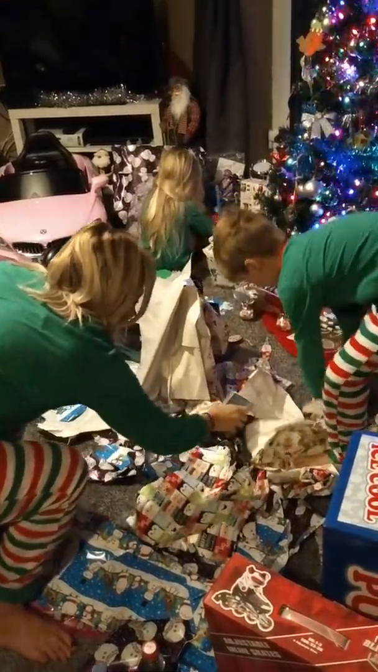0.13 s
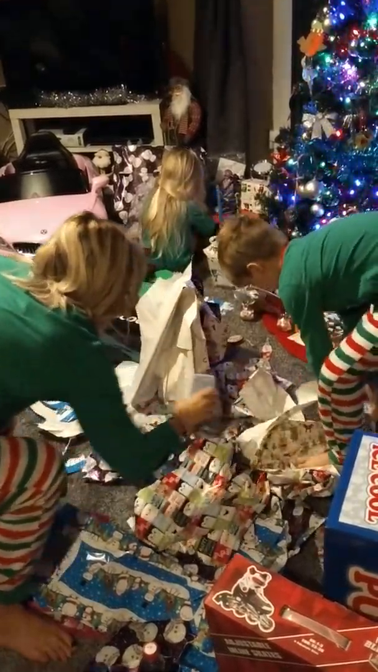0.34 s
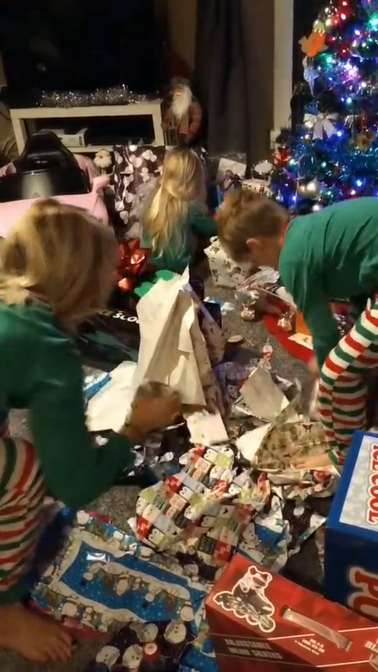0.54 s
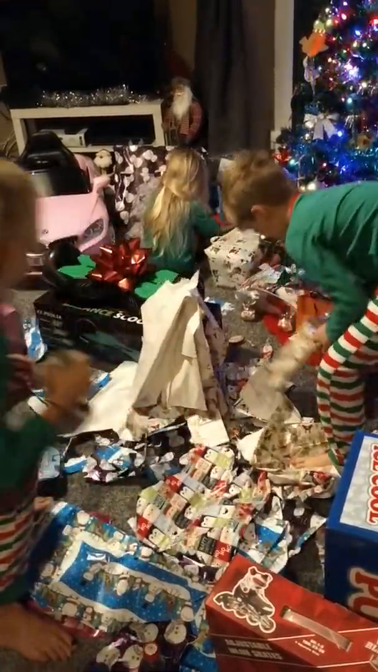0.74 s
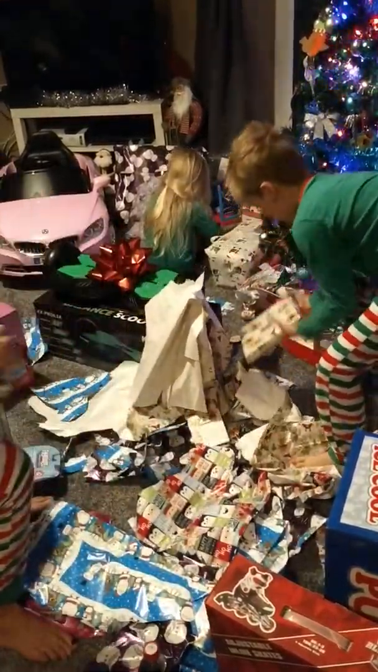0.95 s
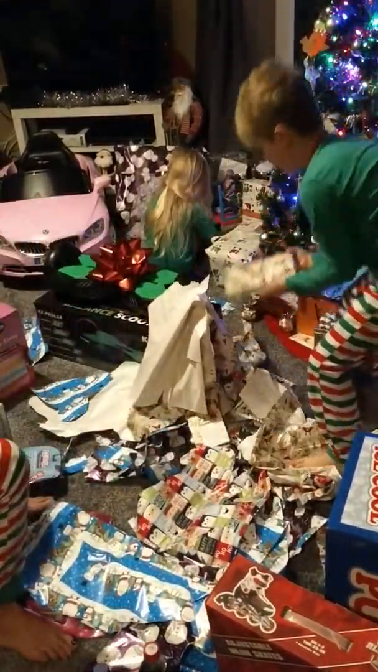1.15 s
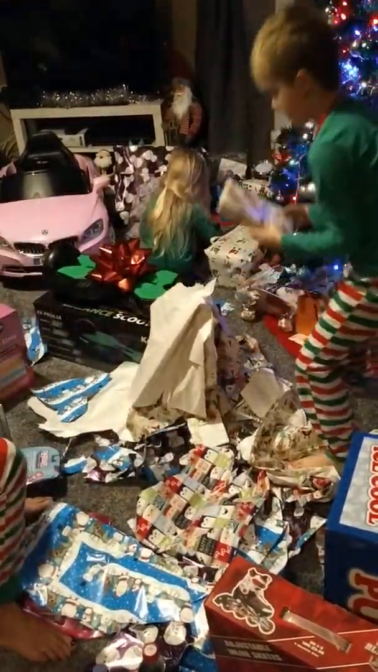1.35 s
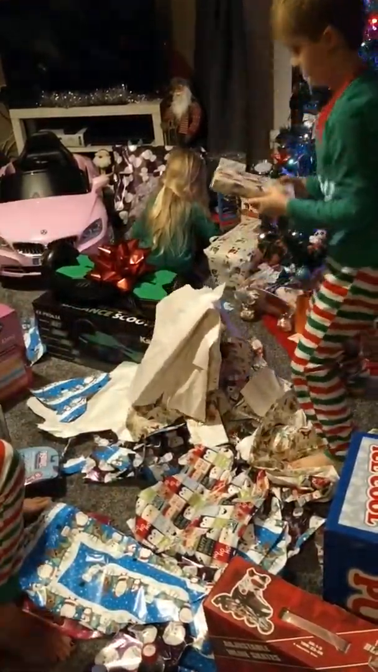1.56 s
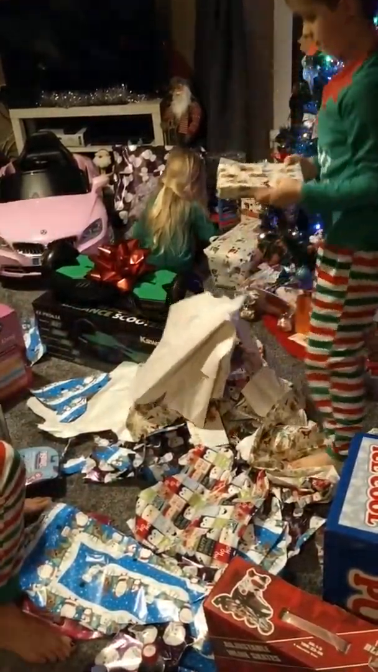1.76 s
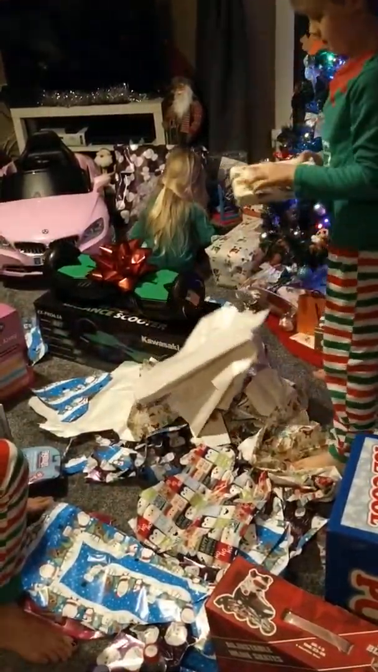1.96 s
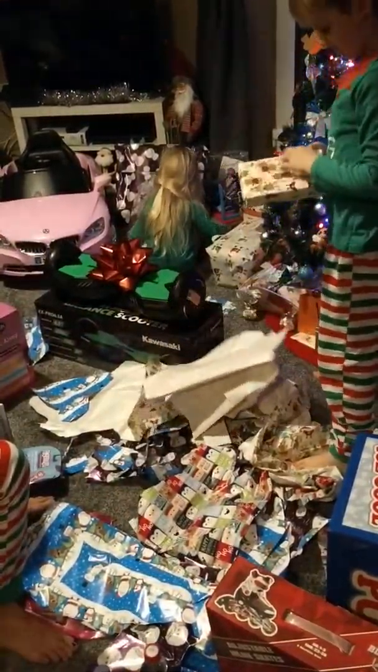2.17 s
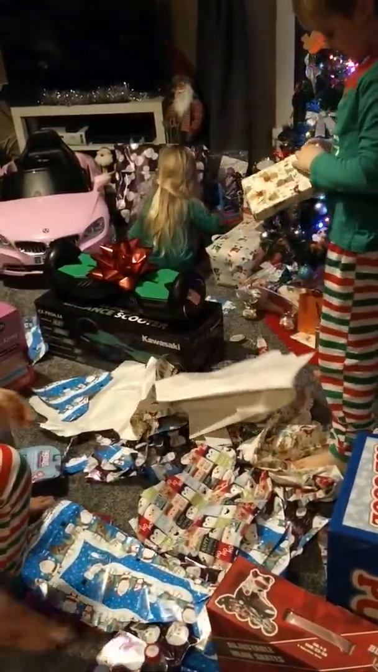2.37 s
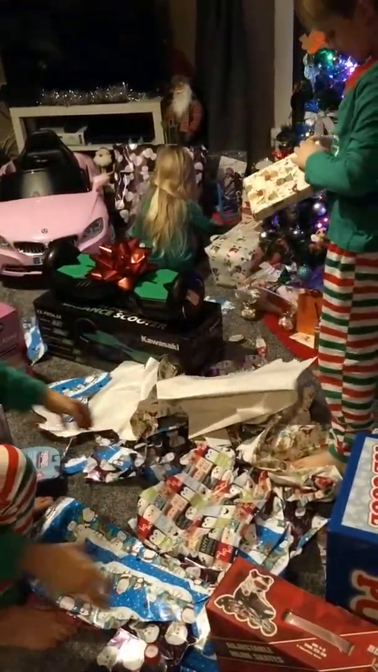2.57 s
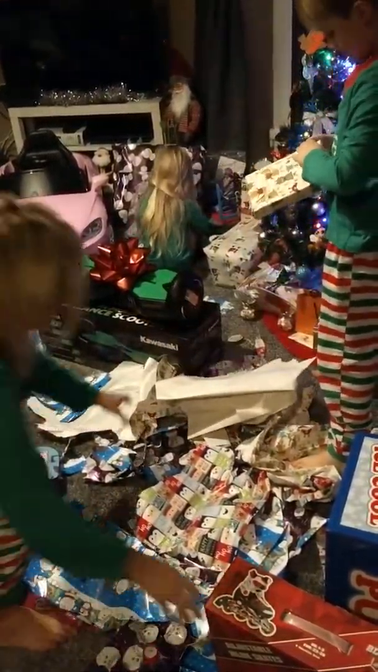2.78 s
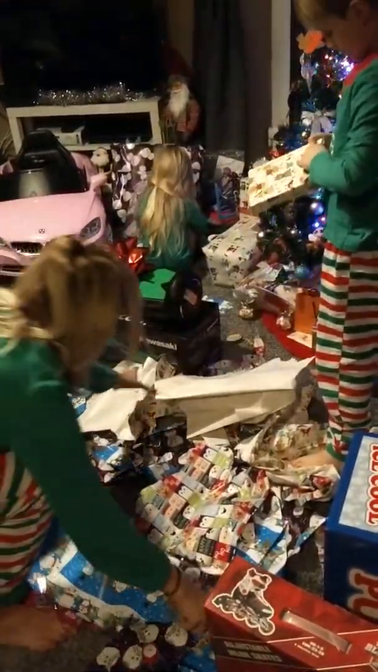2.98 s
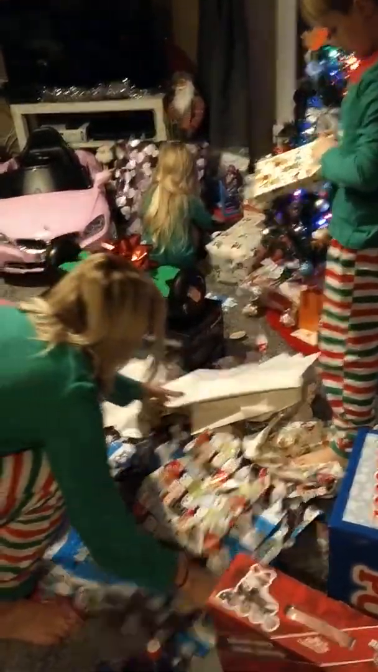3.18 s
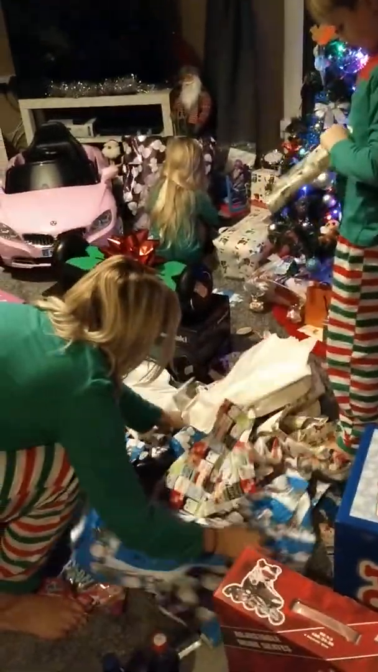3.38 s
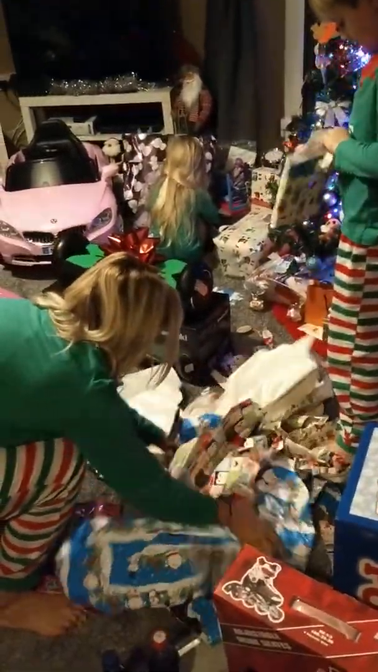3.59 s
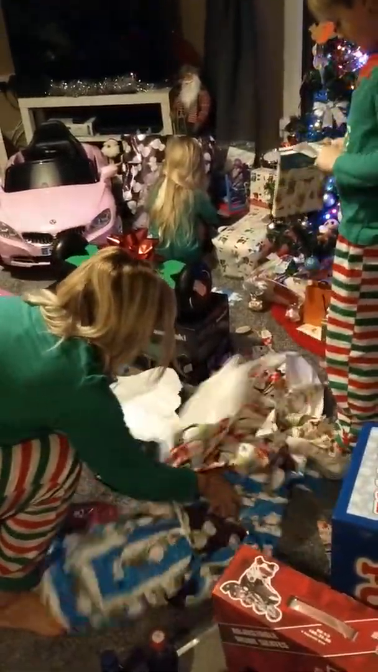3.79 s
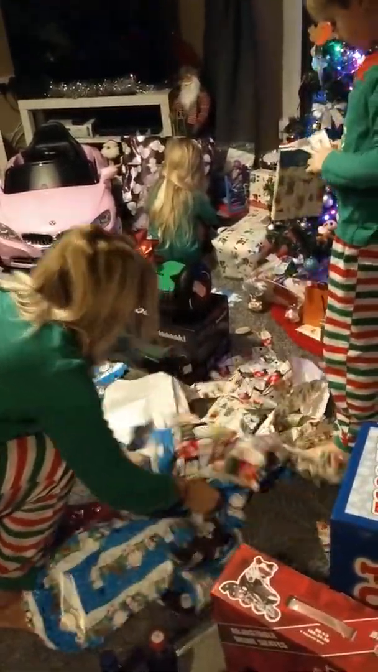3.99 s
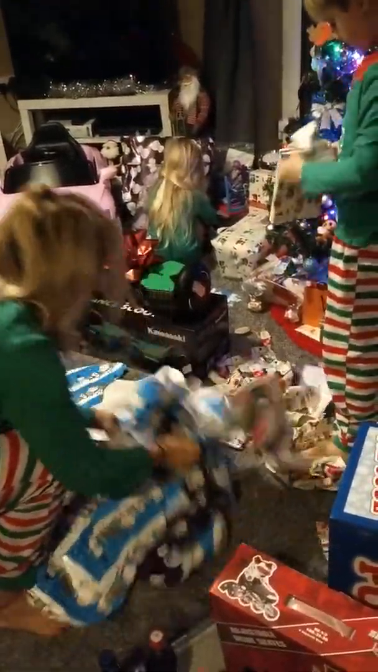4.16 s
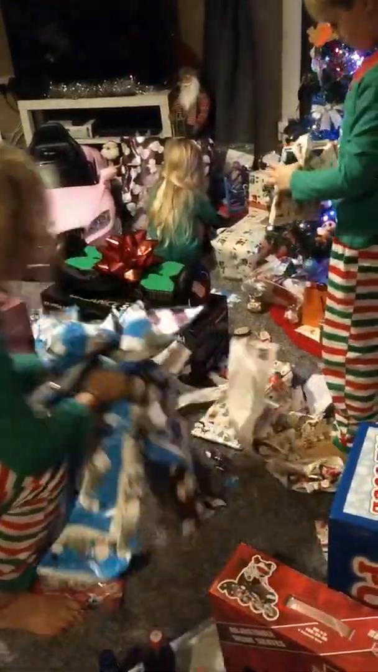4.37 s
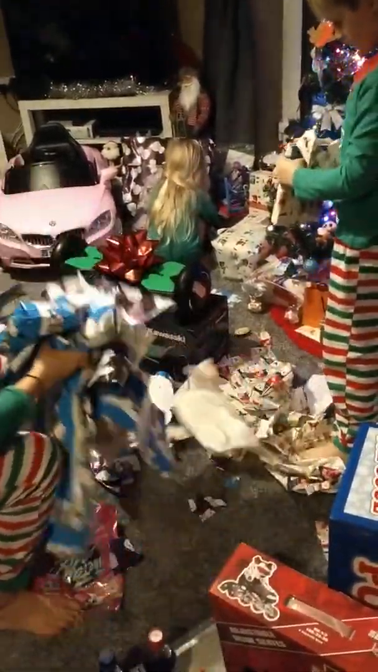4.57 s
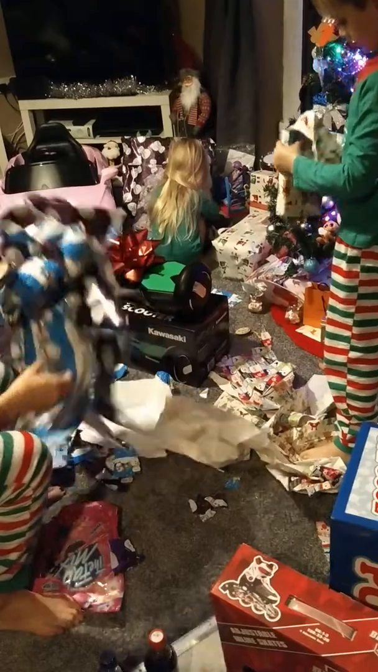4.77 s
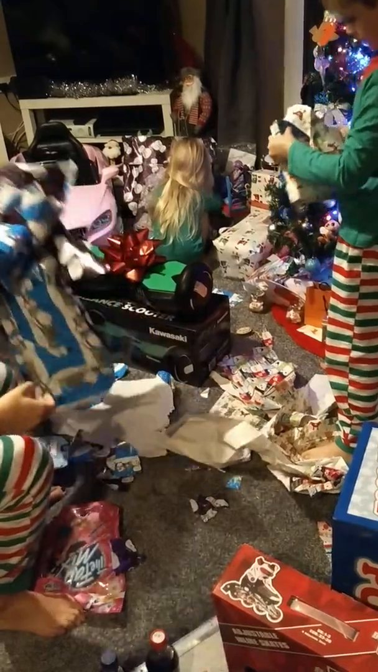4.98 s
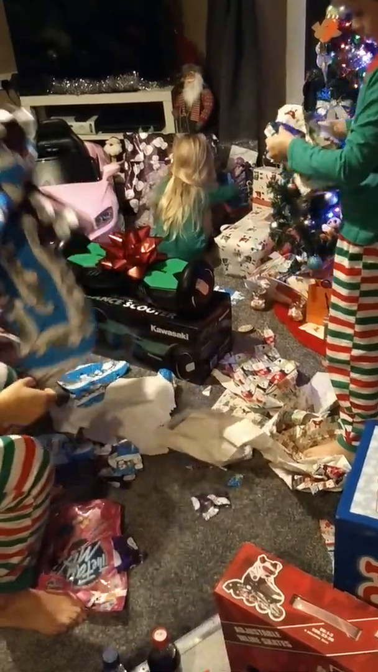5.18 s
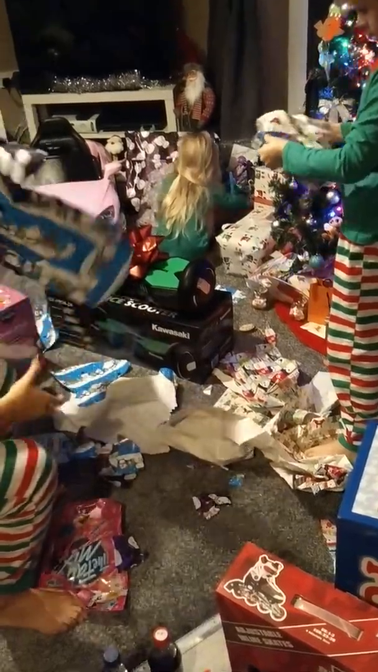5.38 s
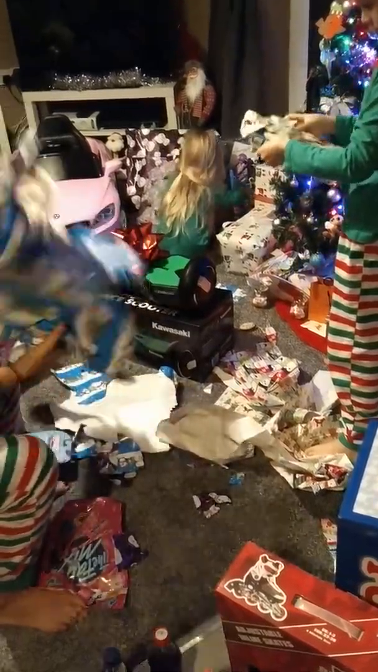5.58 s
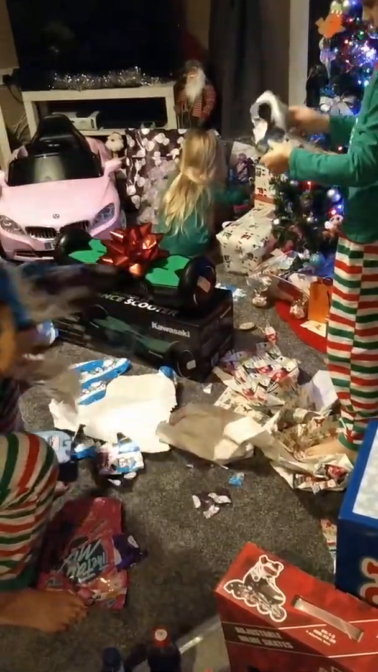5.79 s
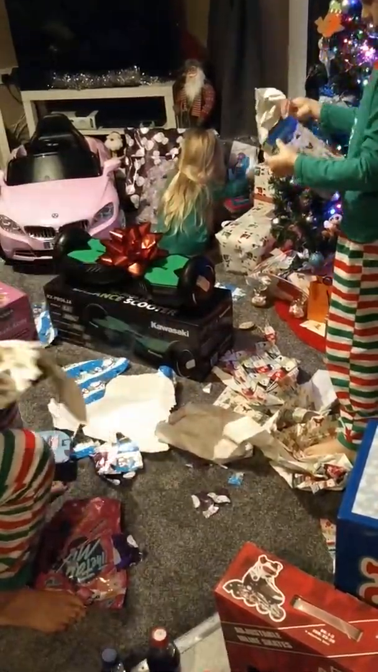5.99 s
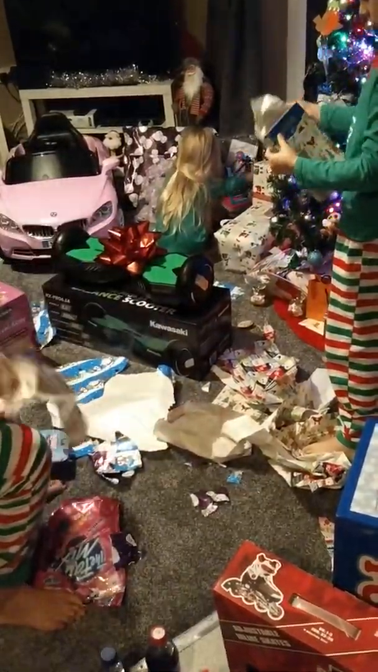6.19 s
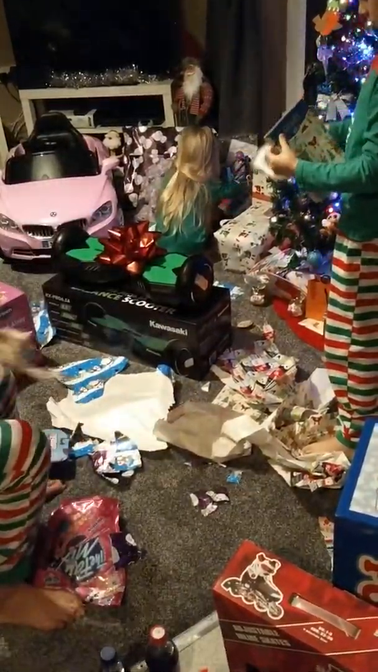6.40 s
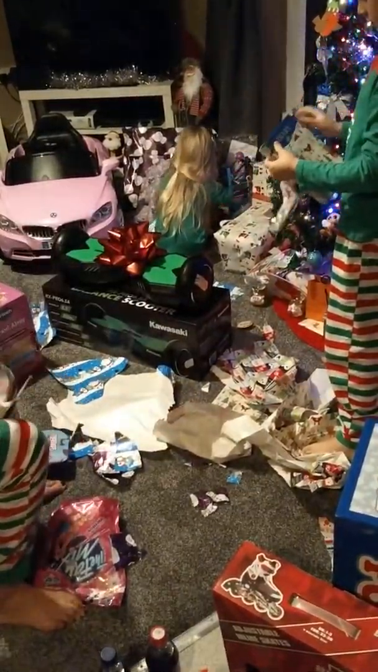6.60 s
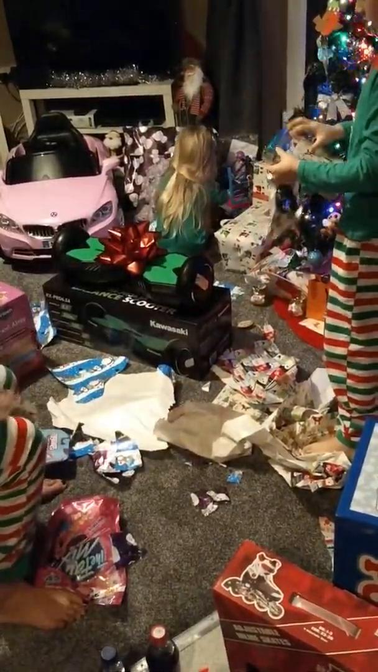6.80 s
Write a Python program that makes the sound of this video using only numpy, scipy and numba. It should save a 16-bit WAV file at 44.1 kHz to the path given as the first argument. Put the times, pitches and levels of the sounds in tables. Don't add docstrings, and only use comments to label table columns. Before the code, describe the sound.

Hands tear and gather wrapping paper indoors, sharp snaps over crisp rustling, two box knocks, and a faint low house hum beneath.

```python
import sys
import numpy as np
from scipy import signal
from scipy.fft import rfft, irfft
from scipy.io import wavfile
from scipy.ndimage import uniform_filter1d, map_coordinates
from numba import njit

SR = 44100
rng = np.random.default_rng(int(sys.argv[2]) if len(sys.argv) > 2 else 0)


def natural_amplitude(level_db):
    exponent = np.asarray(level_db, float) / 20
    return 10 ** exponent


def store_wav(level_fs):
    pcm = np.round(np.clip(np.atleast_2d(level_fs), -1, 1) * 32767)
    wavfile.write(sys.argv[1], SR, pcm.T.astype(np.int16))


N = 302040
PORT_LAG = 18.935


def on_log(hz, table):
    table_hz, table_db = np.transpose(table)
    return np.interp(np.log(np.maximum(hz, 1)), np.log(table_hz), table_db)


def delay(hz, samples):
    return np.exp(-2j * np.pi * hz * samples / SR)


def unit(x):
    return x / np.sqrt(np.mean(x ** 2))


@njit
def rings(start, hz, tau, size, place, count):
    out = np.zeros((count, N))
    for k in range(len(start)):
        pole = np.exp(2j * np.pi * hz[k] / SR - 1 / tau[k])
        push, answer = size[k] * np.e / tau[k] + 0j, 0j
        for i in range(start[k], min(N, start[k] + int(8 * tau[k]))):
            push *= pole
            answer = answer * pole + push
            out[place[k], i] += answer.imag
    return out


def from_all_sides(noises):
    hz = np.fft.rfftfreq(noises.shape[1], 1 / SR)
    lags = np.linspace(-1, 1, len(noises))[:, None] * PORT_LAG / 2
    spectra = rfft(noises)
    ports = [np.sum(spectra * delay(hz, side * lags), axis=0) for side in (1, -1)]
    return irfft(ports, noises.shape[1])


def heard(x, lag, room_db):
    room_t60_s, damp_hz = 0.3, 6300
    t = np.arange(SR // 2) / SR
    walls = from_all_sides(rng.standard_normal((7, len(t)))) * (t > .004)
    dull = signal.lfilter(*signal.butter(1, damp_hz, fs=SR), walls)
    bright = walls - dull
    tail = dull * natural_amplitude(-60 * t / room_t60_s) + bright * natural_amplitude(-120 * t / room_t60_s)
    direct = np.sinc(np.arange(len(t)) - 20 - lag * np.array([[-.5], [.5]]))
    answer = direct + natural_amplitude(room_db) * unit(tail) / np.sqrt(len(t))
    both = signal.fftconvolve(x[None], answer, axes=1)[:, 20:N + 20]
    return both / np.sqrt(1 + natural_amplitude(2 * room_db))


# frequency in Hz, level in dB per Hz.
AIR = [(40, -36), (90, 3), (140, -7.5), (400, -13), (1000, -5.5), (2300, -8.5), (5000, -15), (9000, -22),
       (15500, -20)]
# centre in Hz, width in Hz, level in dB.
HUM_BANDS = [(100, 12, -67), (174, 11, -65), (296.7, 7.6, -67), (334, 60, -64)]


def house():
    hz = np.fft.rfftfreq(N, 1 / SR)
    hiss = rfft(from_all_sides(rng.standard_normal((5, N))))
    air = natural_amplitude(-51.5) * unit(irfft(hiss * natural_amplitude(on_log(hz, AIR)), N))
    for centre, width, db in HUM_BANDS:
        band = rfft(rng.standard_normal(N)) / (1 + ((hz - centre) / width * 2) ** 2)
        air = air + natural_amplitude(db) * unit(irfft([band, band * delay(hz, 4.0)], N))
    return air


# time in seconds, level in dB.
MOTOR_LOAD = [(0.0, -56), (3.62, -55), (3.91, -65), (4.31, -59), (4.54, -66), (5.68, -58), (5.78, -66),
              (6.85, -55)]


def motor():
    t = np.arange(N) / SR
    waver = np.interp(t, np.linspace(0, N / SR, 30), rng.standard_normal(30))
    load_db = np.interp(t, *np.transpose(MOTOR_LOAD)) + 1.5 + 1.8 * waver
    port_phase = np.array([[0], [.15]])
    return natural_amplitude(load_db) * np.sin(2 * np.pi * 140 * t + .5 * waver - port_phase)


def swell(when, peak, db, rise, fall, hold=0):
    since = when[:, None] - peak
    drop = np.maximum(-since / rise, np.maximum(since - hold, 0) / fall)
    return natural_amplitude(2 * (db - 10 * drop))


def gesture(power, weight, fibre_db):
    bands_db = np.array([-8.2 + .41 * weight, weight, 0 * weight, fibre_db])
    return power @ natural_amplitude(2 * bands_db).T


# start in seconds, crackle in dB, fall in seconds per 10 dB, weight in dB, fibre in dB.
TEARS = [(0.002, -47.1, 0.008, 11.5, -11.9), (0.261, -45.7, 0.082, 10.0, -6.8),
         (0.482, -39.7, 0.054, 11.3, -8.0), (1.702, -44, 0.241, -5.6, -6.2),
         (1.8274, -35.1, 0.076, -3.0, -10.1), (1.97, -49.5, 0.319, -11.7, -9.0),
         (2.556, -46.4, 0.044, 17.4, -13.5), (2.6414, -51.1, 0.078, -9.6, -0.2),
         (2.7824, -40.6, 0.147, -8.1, -0.6), (3.004, -33.3, 0.077, -9.1, -23.6),
         (3.0614, -27.1, 0.077, -2.9, -9.1), (4.8174, -38.9, 0.038, -4.5, -1.1),
         (5.1284, -25.0, 0.056, -14.1, -10.1), (5.4524, -45, 0.043, 1.9, -2.0),
         (5.6225, -25, 0.135, -11.2, -16.2), (5.7154, -27.8, 0.049, -0.8, -6.8),
         (6.322, -36.9, 0.246, -5.2, -7.1), (6.5062, -39.8, 0.265, 1.7, -9.1)]


def tears(when):
    s, db, fall, weight, fibre_db = np.transpose(TEARS)
    return gesture(swell(when, s, db, rise=.002, fall=fall, hold=.02), weight, fibre_db)


# peak in seconds, crackle in dB, rise and fall in seconds per 10 dB,
# weight in dB.
CRUMPLES = [(0.072, -48.5, 0.094, 0.025, 18.8), (0.16, -48.3, 0.078, 0.089, -5.6),
            (0.313, -36.9, 0.06, 0.017, 11.0), (0.853, -49.1, 0.008, 0.097, 2.5),
            (1.157, -30.7, 0.032, 0.043, 2.1), (1.218, -32.6, 0.057, 0.044, -12.5),
            (1.79, -41.3, 0.053, 0.065, 0.4), (2.305, -54.6, 0.008, 0.198, 4.6),
            (3.134, -40.6, 0.083, 0.164, 6.4), (3.279, -37.5, 0.021, 0.015, 7.5),
            (3.391, -31.8, 0.138, 0.217, 1.4), (4.008, -32.5, 0.358, 0.069, 4.5),
            (4.177, -37.4, 0.215, 0.008, -0.8), (4.33, -27.9, 0.112, 0.019, 4.4),
            (4.561, -40.3, 0.131, 0.194, 1.2), (4.68, -40.5, 0.198, 0.238, -2.3),
            (5.015, -32.5, 0.108, 0.092, -9.7), (5.182, -25.1, 0.041, 0.047, -5.6),
            (5.543, -43.7, 0.152, 0.008, 2.7), (6.116, -35.5, 0.07, 0.008, 4.8),
            (6.246, -33.2, 0.114, 0.084, 6.0), (6.421, -29.3, 0.06, 0.018, 9.4),
            (6.736, -34.0, 0.064, 0.056, -3.8), (6.786, -41.7, 0.123, 0.048, 11.4)]


def crumples(when):
    *shape, weight = np.transpose(CRUMPLES)
    return gesture(swell(when, *shape), weight, -8 - .15 * weight)


# peak in seconds, level in dB, rise and fall in
# seconds per 10 dB.
FLAPS = [(0.05, -36.5, 0.041, 0.039), (0.548, -43.4, 0.016, 0.113), (0.8, -41.1, 0.081, 0.133),
         (1.049, -39.8, 0.161, 0.035), (1.293, -45.0, 0.008, 0.008), (1.687, -38.1, 0.008, 0.04),
         (1.856, -29.6, 0.008, 0.008), (1.906, -27.4, 0.009, 0.032), (2.6, -36, 0.02, 0.053),
         (3.504, -31.4, 0.016, 0.021), (4.238, -36.0, 0.025, 0.128), (4.961, -37.3, 0.161, 0.109),
         (5.192, -37.2, 0.135, 0.054), (5.452, -36.0, 0.019, 0.02), (5.724, -38.0, 0.056, 0.16),
         (6.154, -37.6, 0.206, 0.13), (6.411, -32.2, 0.11, 0.011), (6.765, -33.9, 0.111, 0.016),
         (1.853, -24, .008, .025),
    (2.575, -34, .008, .04),
]


def flaps(when):
    power = swell(when, *np.transpose(FLAPS)).sum(axis=1)
    return np.outer(power, [1, natural_amplitude(2 * -9), 0, 0])


# peak in seconds, crackle in dB, rise and fall in seconds
# per 10 dB, weight in dB.
DRAGS = [(0.627, -43.9, 0.212, 0.325, -2.7), (0.987, -31.8, 0.109, 0.046, -3.1),
         (1.079, -43.7, 0.04, 0.08, 8.5), (1.381, -31.8, 0.097, 0.077, -6.1),
         (1.481, -31.0, 0.186, 0.05, -6.0), (1.911, -26.8, 0.061, 0.028, -2.9),
         (2.85, -36.1, 0.008, 0.08, -20.9), (2.91, -34.5, 0.067, 0.053, -0.5),
         (3.549, -27.7, 0.13, 0.093, -6.6), (3.675, -34.5, 0.013, 0.031, 8.1),
         (3.761, -26.7, 0.085, 0.069, 2.6), (4.439, -27.2, 0.047, 0.025, -0.5),
         (4.92, -38.6, 0.084, 0.053, -5.2), (5.329, -49.4, 0.008, 0.008, -7.7),
         (5.94, -32.5, 0.199, 0.192, 1.2), (5.476, -39, .03, .04, 0), (5.6185, -30, .003, .02, 6)]


def drags(when):
    *shape, weight = np.transpose(DRAGS)
    return gesture(swell(when, *shape), weight, -6.3 - .32 * weight)


# level in dB of flap, facets, crackle and fibres.
FAR_DB = [-55.7, -64.4, -59.7, -73.5]


def effort_db(when):
    power = tears(when) + crumples(when) + flaps(when) + drags(when)
    return 10 * np.log10(power + natural_amplitude(2 * np.array(FAR_DB))).T


# low edge in Hz, high edge in Hz.
BANDS = [(150, 500), (500, 2000), (2000, 7000), (7000, 15000)]
# frequency in Hz, level in dB.
SHEET = [(170, -12.5), (300, -7), (600, -6), (1200, -5), (2000, 4), (4000, 3.5), (6500, 8), (9000, 2.5),
         (15000, 1)]
# start in seconds, end in seconds, place, share of the creases.
LEAD = [(.93, 1.68, 1, .92), (2.62, 2.99, 1, .95), (3.0, 3.4, 0, .3), (3.42, 3.62, 1, .7),
        (3.65, 4.4, 0, .3), (4.45, 4.84, 2, .3), (4.84, 5.12, 1, .9), (5.6, 6.6, 2, .7)]


def paper(scatter_db=3.0, cycles=0.46, burst_db=2.4, burst_s=.012, boom_hz=900):
    creases_per_s = 5000
    count = int(creases_per_s * N / SR)
    when, big, where, led = rng.random((count, 4)).T
    when = when * N / SR
    hz = 170 + 15830 * rng.random((count, 3)) ** 2
    grid = np.arange(0, N, 40) / SR
    density_db = np.array([np.interp(when, grid, db) - 10 * np.log10(high - low)
                           for db, (low, high) in zip(effort_db(grid), BANDS)]).T
    seat = np.interp(np.log(hz), np.log(np.prod(BANDS, axis=1)) / 2, np.arange(4))
    crease = np.arange(count)[:, None] + 0 * seat
    db = map_coordinates(density_db, [crease, seat], order=1) + on_log(hz, SHEET)
    burst = burst_db * np.interp(when / burst_s, np.arange(2000), rng.standard_normal(2000))
    luck_db = burst - scatter_db * np.log(big + 0.03)
    facets_per_hz = 3 * creases_per_s / (2 * np.sqrt(15830 * (hz - 160)))
    cycles = cycles * (1 + boom_hz / hz)
    size = natural_amplitude(db + luck_db[:, None]) * np.sqrt(hz / (facets_per_hz * cycles)) / 2
    place, stance = np.floor(where * 4), np.floor(where * 12) % 3
    for t0, t1, hands, share in LEAD:
        place[(when > t0) & (when < t1) & (led < share)] = hands
    start = np.repeat(when * SR, 3).astype(np.int64)
    track = np.repeat(3 * place + stance, 3).astype(np.int64)
    sheets = rings(start, hz.ravel(), (cycles * SR / hz).ravel(), size.ravel(), track, 12)
    return natural_amplitude(1.3) * signal.sosfilt(signal.butter(4, 170, "high", fs=SR, output="sos"), sheets)


# start in seconds, peak in dB, body in dB, top in dB.
SNAPS = [(0.155, -25, -11, -3), (0.4678, -33, 0.6, -19), (1.8454, -20, -1.1, -15), (2.2974, -46, -11, -14),
         (2.4956, -40, -5, -16), (2.688, -28.5, -16, -13), (2.8374, -14, -38, -9), (3.3414, -24, -16, -24),
         (3.716, -12, -21, -12), (3.8392, -25, -13, -14), (4.1459, -16.5, -13, -21),
         (4.3001, -15, -26, -14), (4.4244, -15, -13, -17.5), (4.6704, -22, -16, -17),
         (5.003, -22, -21, -17), (5.1514, -8, -21, -13), (5.33, -21, -32, -3), (5.474, -16, -18, -10),
         (5.5258, -22, -14, -20), (5.5772, -14, -31, -20), (5.637, -14, -10.5, -15), (5.657, -14, -9, -20),
         (5.6964, -13, -13, -11), (5.7314, -10, -25, -12), (5.8887, -14.5, -12.5, -9),
         (5.9254, -18, -4, -15), (6.2014, -12, -20, -16), (6.248, -12.5, -10, -21), (6.3464, -13, -10, -13),
         (6.663, -26, -15, -16)]
# start in seconds, peak in dB, body in dB, top in dB.
TICKS = [(0.1236, -35, -20, -8), (0.7362, -37, -20, -8), (1.7185, -27, -20, -8), (1.8342, -26, -20, -8),
         (2.1445, -39, -20, -8), (2.2732, -38, -20, -8), (2.4473, -32, -8, -17), (2.7703, -41, -20, -8),
         (2.7828, -33, -20, -2), (3.0036, -24, -14, -12), (3.0614, -28, -20, -8), (3.3827, -22, -20, -8),
         (4.0716, -25, -20, -8), (4.8, -28, -20, -8), (5.1362, -21, -20, -8), (5.3278, -23, -30, -1),
         (5.4201, -38, -20, -8), (5.5782, -26, -26, -12), (5.6231, -27, -20, -8)]
# start in seconds, peak in dB.
CRACKS = [(0.0532, -31), (0.1414, -35), (1.8469, -18), (2.2743, -33), (2.2997, -38), (2.6426, -32),
          (3.8394, -19), (4.3695, -19), (4.4568, -14), (4.7074, -24), (5.543, -27), (6.248, -16),
          (6.4417, -16), (6.5074, -22), (6.5215, -22), (6.6124, -25), (6.716, -21), (6.7811, -20)]


def snaps(cycles=0.67, after_db=-13, scatter_s=.004):
    openers = [(s, db + 11, -13, -15) for s, db, *_ in TEARS]
    ticks = [(s, db + 7, *colour) for s, db, *colour in TICKS]
    cracks = [(s, db, -12, -14) for s, db in CRACKS]
    s, db, body_db, top_db = np.array([*openers, *SNAPS, *ticks, *cracks]).T[:, :, None]
    chance = rng.random((len(s), 2, 36))
    half_octaves = (np.arange(36) % 9 + chance[:, 0]) / 2
    pitch = 750 * 2 ** half_octaves
    body = body_db * np.clip(2 - half_octaves, 0, 1)
    top = (top_db + 6) * np.clip(half_octaves - 3, 0, 1)
    late = (np.arange(36) >= 9) * -np.log(chance[:, 1]) * scatter_s
    size = natural_amplitude(db + 2 + body + top + after_db * (late > 0)) / 2
    start = ((s + late) * SR).astype(np.int64).ravel()
    return rings(start, pitch.ravel(), cycles * SR / pitch.ravel(), size.ravel(), 0 * start, 1)[0]


# start in seconds, note in Hz, peak in dB, swell in seconds.
PANELS = [(.035, 740, -36, .015), (.03, 380, -40, .015), (.29, 1000, -36, .015), (.464, 480, -37, .004),
          (.48, 860, -37, .01), (.52, 330, -42, .015), (.78, 285, -41, .025), (.92, 330, -42, .02),
          (1.0, 340, -42, .02), (1.04, 250, -42, .02), (1.15, 205, -44, .06), (1.68, 450, -42, .012),
          (1.847, 178, -18, .009), (1.847, 490, -17, .011), (1.848, 720, -25, .008),
          (1.906, 900, -30, .006), (1.88, 200, -28, .008), (1.903, 320, -25, .007), (1.875, 520, -27, .01),
          (1.898, 175, -27, .007), (1.93, 260, -30, .006), (1.97, 200, -34, .008), (2.56, 300, -22.5, .009),
          (2.585, 520, -32, .012), (2.56, 820, -39, .012), (2.57, 660, -34, .01), (2.585, 172, -23, .008),
          (2.602, 240, -27, .008), (2.62, 385, -33, .012), (2.625, 280, -33, .012), (2.665, 310, -41, .01),
          (4.22, 300, -37, .02), (4.92, 335, -38, .04), (5.04, 330, -40, .03), (5.19, 160, -35, .015),
          (5.2, 330, -33, .012), (5.44, 340, -43, .02), (5.74, 175, -45, .06), (6.14, 580, -35, .025),
          (3.5, 300, -40, .015), (3.74, 810, -30, .015), (4.41, 350, -33, .015), (4.44, 1250, -32, .01),
          (5.73, 720, -33, .012), (5.77, 850, -33, .012), (6.03, 410, -38, .02), (6.21, 370, -34, .012),
          (6.38, 580, -30, .012), (6.39, 1030, -33, .012), (6.405, 330, -28, .01)]


def panels(stray=.05, echo_db=-9):
    s, hz, db, swell_s = np.transpose(PANELS)
    off, late = rng.standard_normal((len(s), 2)).T
    start = (np.r_[s, s + swell_s * np.abs(late)] * SR).astype(np.int64)
    notes_hz = np.r_[hz, hz * (1 + stray * off)]
    tau = np.tile(np.maximum(.68 * swell_s, .002) * SR, 2)
    size = natural_amplitude(-4.5 + np.r_[db, db + echo_db])
    return rings(start, notes_hz, tau, size, 0 * start, 1)[0]


# start in seconds, peak in dB, push in seconds.
THUMPS = [(0.038, -35, 0.001), (0.466, -36, 0.0013), (1.8455, -13, 0.001), (1.876, -34, 0.0011),
          (1.909, -30, 0.0017), (2.551, -30, 0.0013), (2.565, -30, 0.001), (2.591, -34, 0.0024),
          (4.239, -21, 0.002), (5.196, -15, 0.0017), (6.39, -28, 0.0012)]
# frequency in Hz, level in dB, decay by 60 dB in seconds.
BOX = [(168, 11, 0.12), (229, 17, .1), (300, -7, 0.16), (385, -8, .1), (514, -1.5, .1), (670, -64, .09),
       (820, -12, .08)]


def thumps(rumble=0.061, settle_s=.1):
    out, t = np.zeros(N), np.arange(SR // 2) / SR
    for s, db, push in THUMPS:
        settling = rumble * rng.standard_normal(len(t)) * natural_amplitude(-60 * t / settle_s)
        force = np.exp(-((t - push) / push) ** 2 * 4) + settling
        body = sum(natural_amplitude(level + 1.3 * rng.standard_normal() - 60 * t / t60) * np.sin(2 * np.pi * hz * t)
                   for hz, level, t60 in BOX)
        start = int(s * SR)
        blow = signal.fftconvolve(force, body)[:N - start]
        out[start:start + len(blow)] += natural_amplitude(db - 13.5) * blow / np.abs(blow).max()
    return out


def carpet_bounce(x):
    centre_hz, width_hz, share = 490, 110, .35
    return x - share * signal.lfilter(*signal.iirpeak(centre_hz, centre_hz / width_hz, fs=SR), x)


# lead of the left port in samples, room in dB.
PLACES = [(-16, 1), (9.5, -4), (8, -3), (12, -3)]
STANCES = [-1.5, 0, 1.5]


def scene():
    spots = [(lag + shift, room_db) for lag, room_db in PLACES for shift in STANCES]
    sheets = sum(heard(x, lag, room_db) for x, (lag, room_db) in zip(paper(), spots))
    around = carpet_bounce(sheets + house() + motor())
    near = heard(snaps(), 8.4, room_db=-3) + heard(thumps(), 2.0, room_db=-6)
    return around + near + heard(panels(), 3.5, room_db=-10)


def top_edge(hz):
    return 1 / np.sqrt(1 + (hz / 15600) ** 500)


# start in seconds, end in seconds, share that slips.
LOCKS = [(0, .45, .5), (.93, 1.68, .001), (1.7, 2.1, .16), (2.64, 2.99, .001), (3.0, 3.2, .7),
         (3.2, 3.4, .5), (3.42, 3.62, .02), (3.65, 4.4, .4), (4.5, 4.84, .5), (4.84, 5.12, .001),
         (5.2, 5.7, .3), (5.74, 6.16, .02), (6.25, 6.6, .6), (6.62, 6.75, .1)]


def slipping():
    t, slip = np.arange(N) / SR, np.full(N, .28)
    for t0, t1, share in LOCKS:
        slip[(t > t0) & (t < t1)] = share
    return np.clip(uniform_filter1d(slip, int(.04 * SR)), 0, 1)


# frequency in Hz, level in dB.
SHADE = [(2200, 0), (4000, -4), (5500, -4), (6900, 0), (8200, -4), (10000, -3), (12000, 0)]
# frequency in Hz, level in dB.
GRIP = [(5000, 0), (7000, -2.5), (9400, -1), (11700, -.3), (14000, 0)]
# frequency in Hz, level in dB.
SLIP_REACH = [(1200, -34), (2300, -1.5), (3500, -8), (4700, -10), (7000, 2), (9400, -12), (12000, 3),
              (14000, -1)]
# frequency in Hz, gain in dB.
WIDTH = [(60, 3), (150, 0), (300, 1), (550, 3.5), (1100, -3), (2200, -1), (9000, 0), (13000, 1)]


def widen(dry, twist=0.75, twist_s=.05):
    cross = .985
    hz, t = np.fft.rfftfreq(N, 1 / SR), np.arange(N) / SR
    left, right = rfft(dry)
    ports = np.array([left, right * natural_amplitude(on_log(hz, SHADE))])
    across = cross * natural_amplitude(on_log(hz, GRIP)) * delay(hz, PORT_LAG) * ports[::-1]
    lost_bass = np.maximum(np.sqrt(2) / np.abs(1 - cross * delay(hz, PORT_LAG)), 1)
    lift = np.where(hz < SR / PORT_LAG / 4, lost_bass, 1)
    cut = top_edge(hz) / np.sqrt(1 + (102 / (hz + 1)) ** 8)
    wide = irfft((ports - across) * lift * cut, N)
    loose = across * natural_amplitude(on_log(hz, SLIP_REACH)) * cut
    slip = slipping()
    wander = np.interp(t / twist_s, np.arange(500), rng.standard_normal(500))
    drift = twist * np.sqrt(slip) * wander
    wide = wide + slip * irfft(loose, N) + drift * irfft(1j * loose, N)
    side = (wide[0] - wide[1]) / 2
    extra = irfft(rfft(side) * (natural_amplitude(on_log(hz, WIDTH)) - 1), N)
    return wide + extra * np.array([[1], [-1]])


# frequency in Hz, level in dB per Hz.
CAPSULE = [(25, -15), (55, -18), (100, -1), (250, -18), (5000, -39), (15500, -35)]


def capsule_hiss():
    hz = np.fft.rfftfreq(N, 1 / SR)
    hiss = irfft(rfft(rng.standard_normal((2, N))) * natural_amplitude(on_log(hz, CAPSULE)) * top_edge(hz), N)
    return natural_amplitude(-64.5) * unit(hiss) * np.array([[1.3], [.6]])


# low edge in Hz, high edge in Hz, level in dB, share in the right port.
ROCKING = (40, 95, -70, .55)


def rocking():
    low_hz, high_hz, db, share = ROCKING
    band = signal.butter(2, [low_hz, high_hz], "band", fs=SR, output="sos")
    rumble = signal.sosfilt(band, rng.standard_normal(N))
    return natural_amplitude(db) * unit(rumble) * np.array([[1], [-share]])


def low_pass(x):
    return signal.sosfilt(signal.butter(12, 16830, fs=SR, output="sos"), x)


def record(dry):
    mix = widen(dry) + capsule_hiss() + rocking()
    return low_pass(mix)


dry = scene()
out = record(dry)
store_wav(out)
```